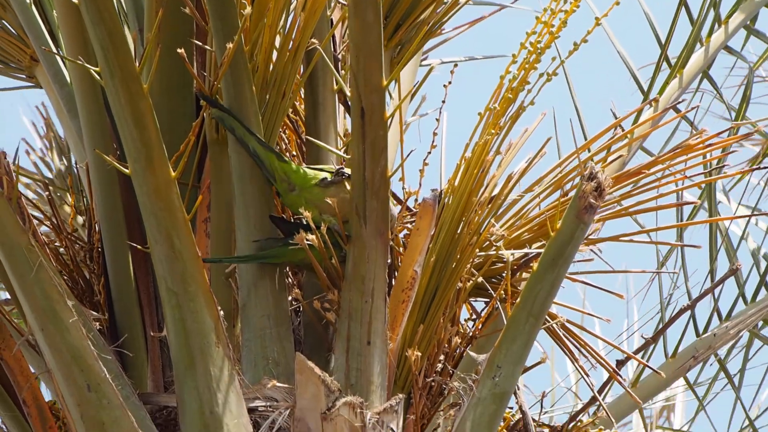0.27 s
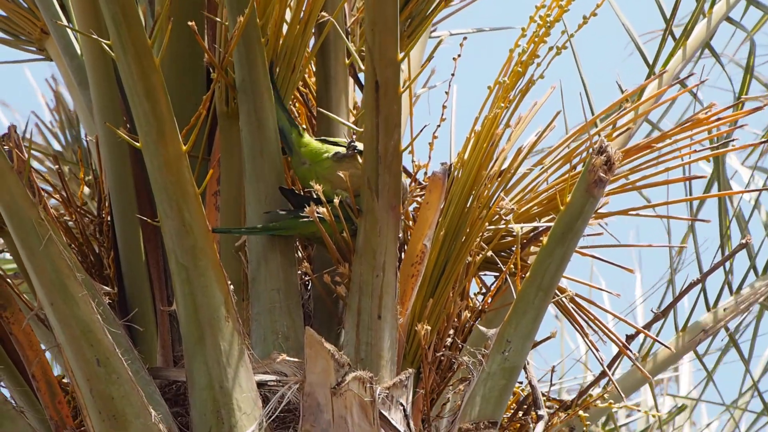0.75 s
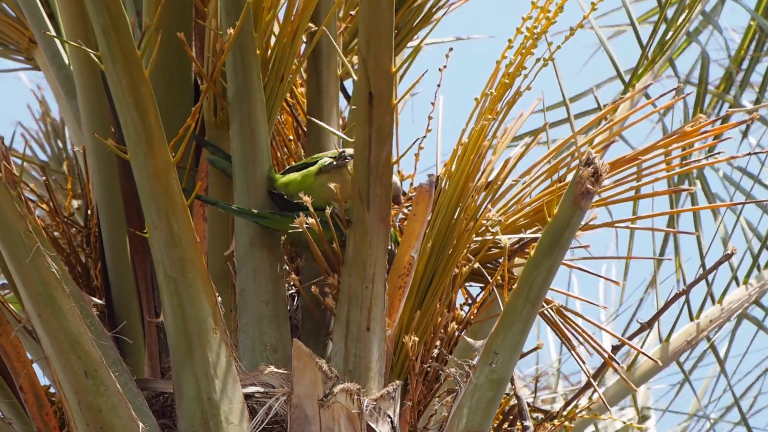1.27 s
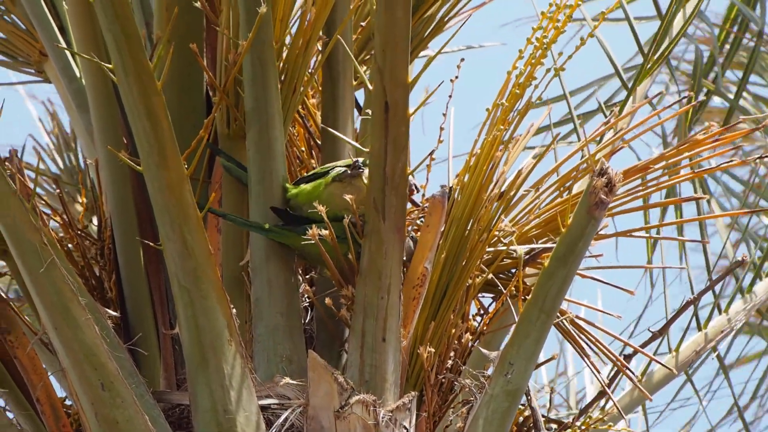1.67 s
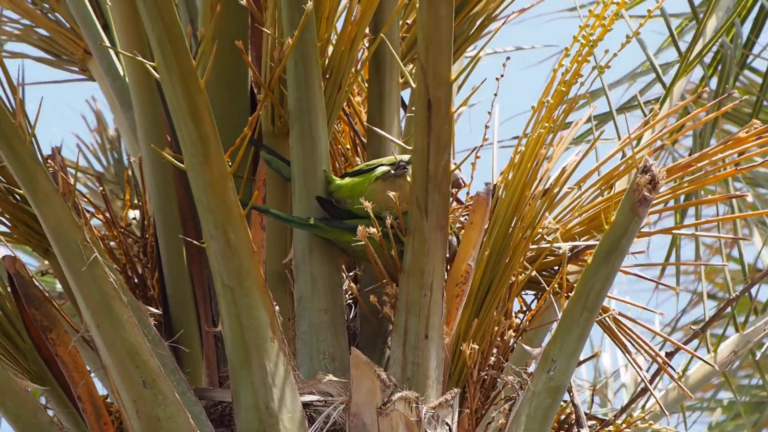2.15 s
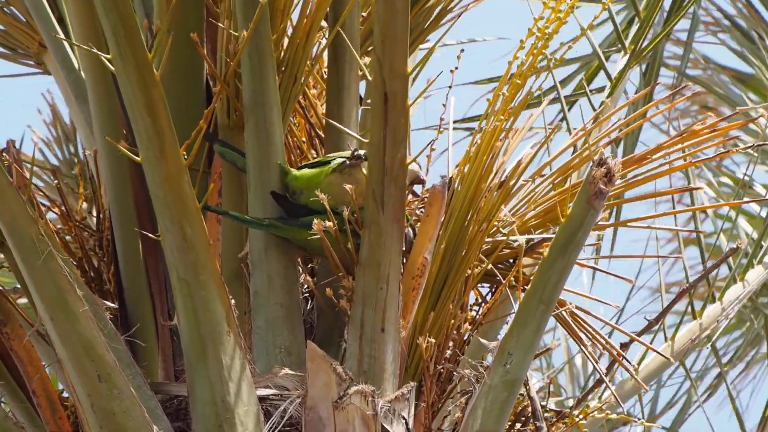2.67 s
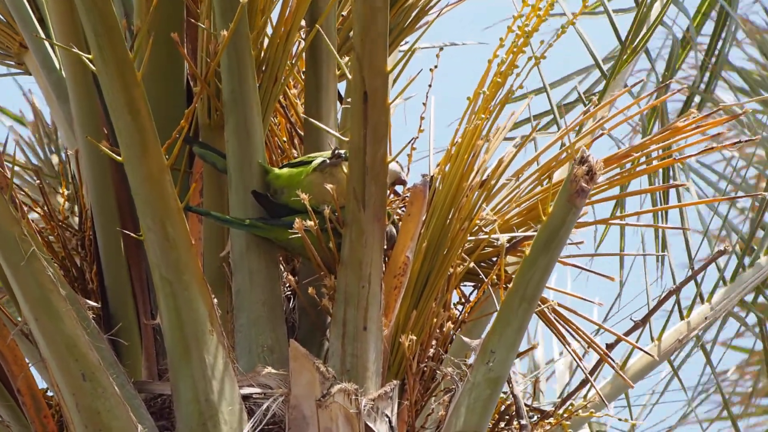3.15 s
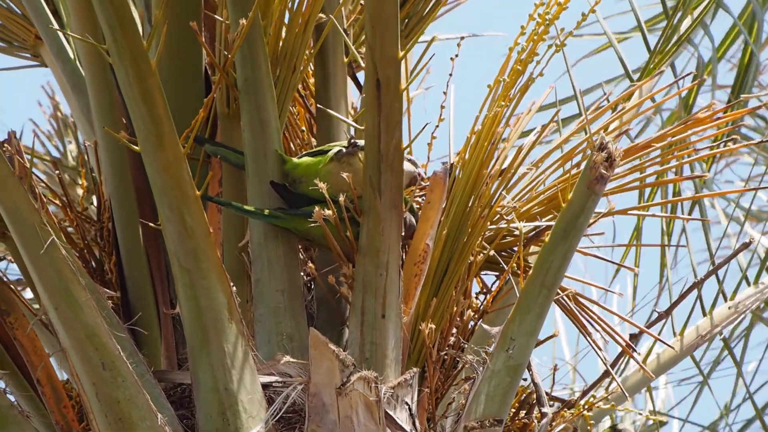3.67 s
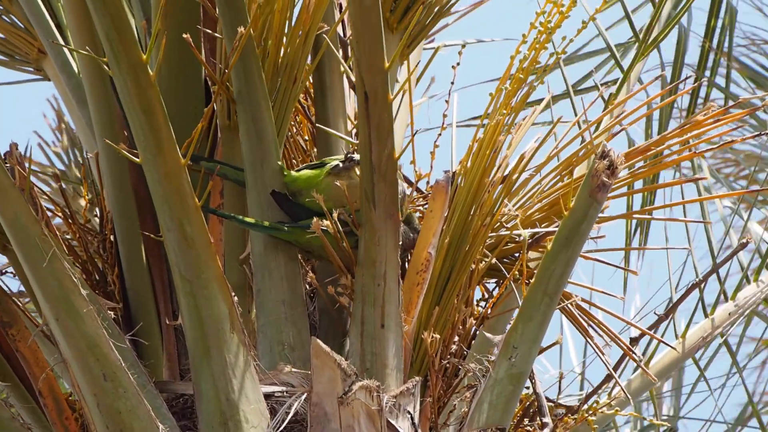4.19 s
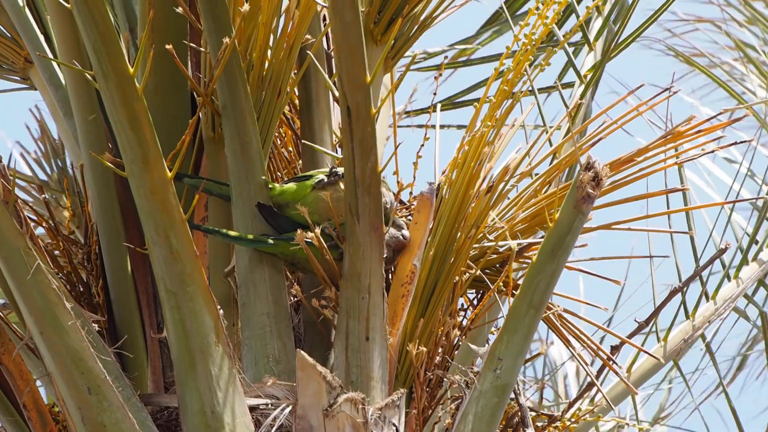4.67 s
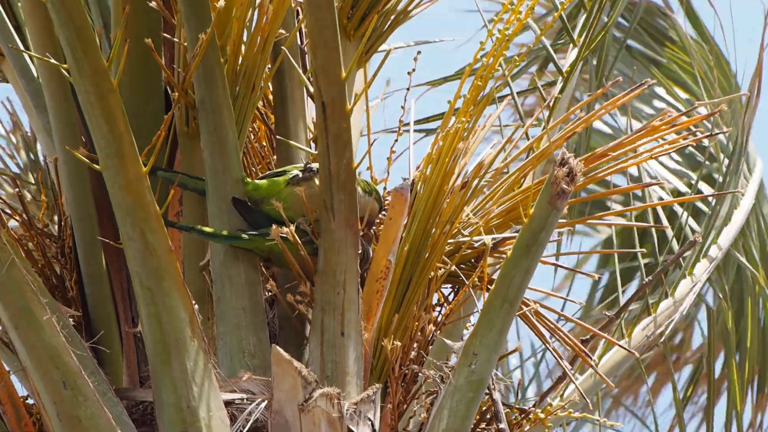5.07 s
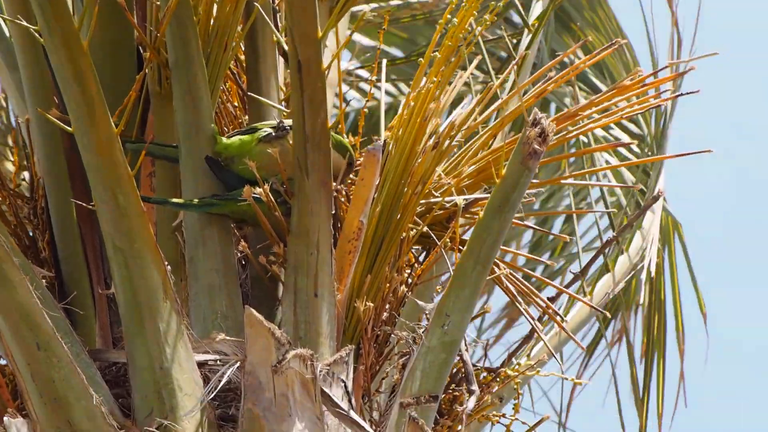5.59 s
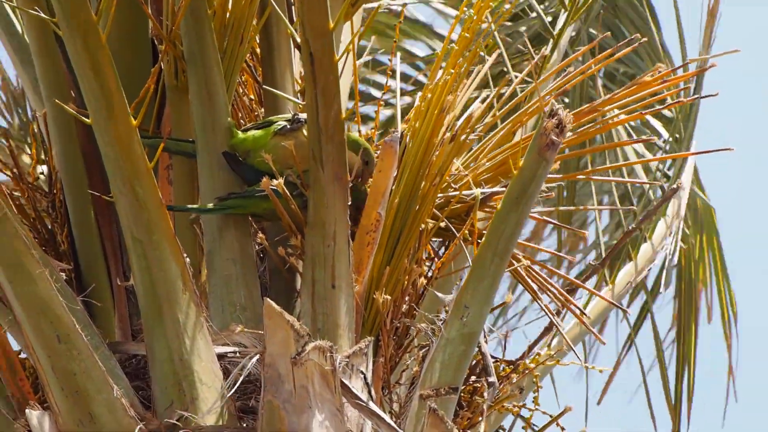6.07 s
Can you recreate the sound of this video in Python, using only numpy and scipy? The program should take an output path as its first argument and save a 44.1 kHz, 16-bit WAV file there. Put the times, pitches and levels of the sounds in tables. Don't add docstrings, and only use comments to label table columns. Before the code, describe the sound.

Wind buffets a camera microphone with lumpy rumbles and thumps while parakeets in a palm crown chirp, squawk harshly and squabble in quick warbles.

```python
import sys
import numpy as np
from scipy import signal
from scipy.fft import rfft, irfft, next_fast_len
from scipy.io import wavfile
from scipy.ndimage import uniform_filter1d, map_coordinates

SR = 44100
rng = np.random.default_rng(int(sys.argv[2]) if len(sys.argv) > 2 else 0)


def rack_gain(trim_db):
    fader = np.asarray(trim_db, float)
    return 10 ** (fader / 20)


def transcribe(signal):
    frames = np.atleast_2d(signal).T
    limited = np.clip(frames, -1, 1)
    pcm = np.round(limited * 32767).astype(np.int16)
    wavfile.write(sys.argv[1], SR, pcm)


N = 279153

# first pulse t/s, highest pulse t/s, last pulse t/s, level/dB, top pitch f/Hz
SQUAWKS = [
    (1.399, 1.517, 1.6, -39.5, 1189),
    (2.315, 2.469, 2.575, -27.5, 1248),
    (3.039, 3.15, 3.278, -26, 1100),
    (3.44, 3.534, 3.657, -24.5, 1031),
    (4.005, 4.141, 4.316, -27.5, 1103),
]
FOLDS_DB = [0, -2, 0, 4, -6, 4, -2, 2, -1, 2, 0, 3, 5, 6]
# f/Hz, level/dB
HARSH_THROAT = [(1000, -28), (1800, -5), (2800, 5.5), (5100, -3), (6300, -6.5), (8000, -12.5),
                (10500, -15.5), (12000, -32.5), (14500, -38), (15500, -45)]
# f/Hz, level/dB
SWEET_THROAT = [(1000, -7.5), (1900, -1.5), (3600, 2.5), (4600, -3), (5800, -6), (7500, -17), (9500, -10),
                (13000, -50)]
# f/Hz, level/dB
FAR_THROAT = [(3700, 0), (4000, -40)]
# offset t/ms, length t/ms, start f/Hz, middle f/Hz, end f/Hz
CONTACT_NOTES = [(5, 18, 1850, 2220, 2320), (25, 21, 1850, 2020, 1400), (47, 19, 1450, 1830, 1980),
                 (71, 15, 2000, 1680, 1850), (95, 21, 1900, 1740, 1760), (118, 28, 1250, 1100, 1140),
                 (153, 22, 1620, 1800, 1950), (178, 18, 2050, 1650, 1250)]
# t/s, level/dB, last note begins before t/ms
CONTACTS = [
    (.209, -39.5, 110),
    (.806, -37.5, 200),
    (2.011, -32, 200),
]
# t/s, pitch f/Hz, level/dB
SQUABBLE = [
    [(5.01, 2100, -34), (5.025, 2350, -29), (5.038, 1700, -33), (5.043, 2100, -29.5), (5.057, 2230, -33),
     (5.067, 1750, -36), (5.09, 2100, -36), (5.118, 2450, -36)],
    [(5.114, 1700, -30), (5.132, 2150, -36), (5.135, 1800, -27), (5.146, 1850, -29), (5.168, 2250, -29),
     (5.182, 1950, -44), (5.196, 1720, -26), (5.207, 2150, -33), (5.222, 2050, -33)],
    [(5.228, 2000, -36), (5.234, 1700, -35), (5.258, 1950, -37), (5.278, 2700, -45), (5.285, 1950, -40),
     (5.3, 1300, -48), (5.314, 1850, -36), (5.326, 1700, -48)],
    [(5.528, 2380, -30), (5.538, 1930, -33), (5.544, 2400, -42), (5.547, 2000, -26), (5.561, 2280, -40),
     (5.565, 1980, -30), (5.574, 1680, -30), (5.587, 2200, -34), (5.595, 2260, -34)],
]
# t/s, length t/ms, level/dB, start f/Hz, end f/Hz
CHIRPS = [(.545, 28, -40.5, 1400, 1650), (.573, 20, -42, 1800, 1500), (1.2, 20, -41, 1850, 1530),
          (1.84, 28, -39, 1700, 1450), (2.205, 14, -36, 1200, 1180), (3.68, 16, -34, 2350, 2400),
          (3.706, 13, -30, 1980, 1600), (3.719, 10, -31, 1600, 1850), (3.736, 34, -36, 1790, 1930),
          (3.774, 30, -35, 1870, 1950), (4.63, 30, -42, 1250, 1620), (4.736, 26, -33, 2380, 2260),
          (4.763, 14, -36, 1950, 1930), (4.793, 22, -38, 1800, 1700), (4.83, 55, -39, 1830, 2000),
          (4.859, 35, -41, 1200, 1360), (4.975, 15, -38, 2200, 2600), (5.342, 16, -32, 1820, 1650),
          (5.367, 22, -32, 2720, 2450), (5.378, 22, -31, 1120, 1160), (5.4, 22, -34, 2380, 2420),
          (5.495, 26, -35, 1750, 2200)]
# t/s, length t/ms, level/dB, end f/Hz (both ends), middle f/Hz
WHISTLES = [(5.8, 100, -41.5, 2060, 2060), (6.17, 150, -48, 2570, 2560), (.685, 42, -45, 2900, 3300),
            (.452, 26, -46, 2750, 3550), (1.725, 85, -43, 2330, 2720), (1.812, 36, -43, 2400, 3100),
            (1.875, 40, -45, 2700, 2300), (.4, 32, -44, 2850, 2350)]
# t/s, length t/s, level/dB
CHATTER = [(0, 0.13, -39.5), (0.418, 0.18, -38.5), (0.98, 0.13, -46), (1.42, .12, -32), (1.857, 0.12, -65),
           (2.24, 0.081, -43), (4.69, 0.84, -42), (5.177, 0.22, -32), (5.31, 0.22, -29), (5.46, 0.17, -33),
           (5.553, 0.052, -46), (2.85, 0.59, -46)]
# f/Hz, t60 t/s
CROWN_T60 = [(1000, 0.22), (4000, 0.31), (10000, 0.17)]
# f/Hz, level/dB
SCATTER = [(2000, -7.5), (5000, -9), (9000, -1.5)]
# t/s, flutter level/dB, left-right level/dB
WIND = [(0, -23, -23), (.25, -24, -20), (.5, -32, -12), (.8, -30.5, -28), (.96, -39, 4), (1.06, -25.5, -16),
        (1.31, -35, -9), (1.43, -71, 2), (1.6, -25.5, -34), (1.92, -40.5, -27), (2.3, -25.5, -12),
        (2.75, -38, -13), (3.45, -28.5, -13), (3.82, -25, 17.5), (4.0, -43.5, -6), (4.4, -56.5, -7),
        (4.7, -31.5, -37.5), (6.33, -32.5, -31)]
# t/s, length t/s, change of flutter level/dB
GUSTS = [(.13, 0.33, 1), (.64, 0.21, 13.5), (.81, 0.29, 9), (1.2, 0.14, 8), (1.72, 0.47, 5),
         (2.04, 0.08, 9.5), (2.19, 0.098, 8.5), (2.39, 0.14, -11), (2.6, 0.1, 9), (3.09, 0.16, 9),
         (3.24, 0.19, 9), (3.49, 0.1, 11), (3.62, 0.16, -5.5), (3.76, 0.047, 9), (4.16, 0.18, -16),
         (4.26, 0.19, 4), (4.55, 0.42, 9), (3.0, 0.092, 7.5), (5.0, 0.47, -20), (5.2, 0.059, 10.5),
         (5.42, 0.19, -6), (5.53, 0.06, 9), (5.6, 0.13, -15.5), (5.77, 0.26, -9), (1.96, 0.054, 9),
         (5.36, 0.059, 2), (5.9, 0.17, 1.5), (6.25, 0.9, 2)]
# t/s, peak level/dB, left-right level/dB
POPS = [(0.023, -13, -25), (0.08, -13.5, -25), (0.811, -16, -27), (1.175, -15, -26), (1.754, -14.5, -28),
        (0.141, -4.5, -35), (0.629, -0.5, -33), (0.644, -6, -36), (0.784, -13.5, -29), (1.124, -20, -29),
        (1.338, -22.5, -17), (1.652, -11.5, -29), (2.127, -15, -26.0), (2.132, -14, -28), (2.172, -11, -28),
        (2.464, -12, -34), (2.509, -15, -24), (3.073, -9.5, -26), (3.193, -21, -23), (3.458, -15.5, -23),
        (3.476, -8.5, -24), (3.701, -14, 27), (3.748, -8, 21), (3.839, -11, 14), (3.859, -8.5, 16),
        (3.947, -22, 11), (4.684, -20, -21)]
# f/Hz, level/dB
RUMBLE_SPECTRUM = [(15, -44), (30, -21), (60, -5), (100, 0.5), (160, 0), (260, -8.5), (450, -15.5),
                   (900, -61), (2000, -110)]
# f/Hz, level/dB
FLUTTER_SPECTRUM = [(100, -18), (250, 0.5), (400, 0), (700, -5.5), (1050, -12.5), (1300, -24),
                    (2000, -28.5), (4000, -46), (9000, -86)]
# f/Hz, level/dB
POP_SPECTRUM = [(150, 12), (900, 0.5), (1350, -14.0), (2200, -10), (6000, -36), (12000, -57)]
# f/Hz, level/dB
FROND_SPECTRUM = [(290, -41), (500, -26), (569, 0), (666, -4), (851, -8), (1040, -4.5), (1250, -13),
                  (1740, -6), (2680, -7), (5740, -23), (8840, -20), (15500, -40)]
# t/s, level/dB
HISS = [(0, -68), (1.5, -61), (3.1, -56.5), (4.6, -57), (6.33, -56)]
# t/s, level/dB
HUM = [(0, -47.5), (5.4, -83), (5.55, -48), (6.33, -43.5)]

HOARSE_UNTIL_S = 2
PULSE_S, DRAWL_S = .026, .035
CLIMB, SINK = .29, .2
CLIMB_DB, SINK_DB, UNEVEN_DB = 8.5, 5.5, 1.5
SECOND_DB = 6.5
ANSWER_DB, ANSWER_S = 0.5, 0.052
RUMBLE_DB, RUMBLE_FOLLOWS = -23, 0.33
GUST_LEANS = 0.031


def throat_pulses():
    rows = []
    for first, top, last, db, hz in SQUAWKS:
        spacing_s = DRAWL_S if first < HOARSE_UNTIL_S else PULSE_S
        s = np.linspace(first, last, round((last - first) / spacing_s) + 1)
        before = (np.clip(top - s, 0, None) / .15) ** 3
        after = np.clip((s - top) / (last - top), 0, None)
        pulse_db = db - CLIMB_DB * before - SINK_DB * after ** 4
        pulse_hz = hz * (1 - CLIMB * before - SINK * after ** 1.315)
        rows += zip(s, pulse_db, pulse_hz)
    scatter = [[.001], [UNEVEN_DB], [10]] * rng.standard_normal((len(rows), 3)).T
    return np.transpose(rows) + scatter


def warbles():
    calls = [(s + at / 1000, ms, db, *hz)
             for s, db, until_ms in CONTACTS
             for at, ms, *hz in CONTACT_NOTES if at < until_ms]
    glides = [(s, 1000 * (end - s), db, hz, to_hz)
              for turns in SQUABBLE
              for (s, hz, db), (end, to_hz, _) in zip(turns, turns[1:])]
    straight = [(s, ms, db, hz, (hz + to_hz) / 2, to_hz) for s, ms, db, hz, to_hz in glides + CHIRPS]
    return calls + straight


def sing(notes, throat, folds_db, jitter, breath_db, edge_s, uneven_db):
    voice, effort = np.zeros(N + SR), np.zeros(N + SR)
    shake = 1 + jitter * wobble(300, count=1)[0]
    order = np.arange(1, 15)[:, None]
    folds_db = np.reshape(folds_db, (-1, 1))
    luck = rng.standard_normal((len(notes), 14, 2))
    for (s, ms, db, f0_hz, f1_hz, f2_hz), dice in zip(notes, luck):
        at, n = round((s - edge_s / 2) * SR), round((ms / 1000 + edge_s) * SR)
        u = np.linspace(-1, 1, n) * (1 + edge_s * 1000 / ms)
        slope, bend = (f2_hz - f0_hz) / 2, (f0_hz + f2_hz) / 2 - f1_hz
        pitch_hz = f1_hz + slope * u + bend * u * u
        pitch_hz = pitch_hz[:N - at] * shake[at:at + n]
        partial_hz = order * pitch_hz
        gains = rack_gain(along(throat, partial_hz) + folds_db + uneven_db * dice[:, :1])
        gains = gains * (partial_hz < SR / 2)
        phase = order * 2 * np.pi * np.cumsum(pitch_hz) / SR + 2 * dice[:, 1:]
        stack = np.sum(gains * np.sin(phase), 0)
        window = signal.windows.tukey(n, min(1, 2 * edge_s * SR / n))
        shape = rack_gain(db) * window[:len(pitch_hz)]
        voice[at:at + len(pitch_hz)] += shape * unit(stack)
        effort[at:at + len(pitch_hz)] += shape
    breath = unit(coloured(rng.standard_normal(N), throat))
    return voice[:N] + rack_gain(breath_db) * uniform_filter1d(effort[:N], size=300) * breath


def parakeets(s, db, hz):
    gap_ms = 1000 * np.diff(s, append=9)
    drawl = s < HOARSE_UNTIL_S
    ms = np.where(drawl, np.minimum(gap_ms - 3, 40), np.minimum(gap_ms - 9, 17))
    sag = np.clip((db + 42) / 100, .03, .16) * rack_gain(rng.normal(0, .8, len(s)))
    pulses = np.transpose([s + .001, ms, db + 2, hz * (1 + 1.25 * sag), .99 * hz, hz * (1 + .7 * sag)])
    hoarse = sing(pulses[drawl], HARSH_THROAT, FOLDS_DB,
                  jitter=.018, breath_db=-4, edge_s=.008, uneven_db=3)
    harsh = sing(pulses[~drawl], HARSH_THROAT, FOLDS_DB,
                 jitter=.005, breath_db=-14, edge_s=.006, uneven_db=1.5)
    sweet = sing(warbles(), SWEET_THROAT, SECOND_DB * (np.arange(14) == 1),
                 jitter=.009, breath_db=-11, edge_s=.006, uneven_db=1.5)
    far = sing([(*row, row[3]) for row in WHISTLES], FAR_THROAT, 0,
               jitter=.003, breath_db=-60, edge_s=.015, uneven_db=0)
    return hoarse + harsh + sweet + far


def flock(pulse_s, birds):
    t = np.arange(N) / SR
    pitch_hz = np.array([[1900], [2200]]) * rack_gain(1.4 * wobble(65) + .15 * wobble(400))
    turns = 2 * np.pi * np.cumsum(pitch_hz, 1) / SR
    stacks = sum(np.sin(k * turns) for k in range(1, 5))
    notes = np.sum(stacks * np.clip(wobble(60), 0, 1), 0)
    since_s = t - pulse_s[np.searchsorted(pulse_s, t) - 1]
    silent = np.clip(np.abs(since_s) / .05 - 1, 0, 1)
    blur = unit(coloured(rng.standard_normal((2, N)), HARSH_THROAT))
    power = uniform_filter1d(birds ** 2, round(ANSWER_S * SR), origin=round(0.19 * ANSWER_S * SR))
    joining = rack_gain(ANSWER_DB) * np.sqrt(np.abs(power))
    level = joining + bumps([(s, length, rack_gain(db)) for s, length, db in CHATTER])
    warbled = .75 * silent * unit(coloured(notes, SWEET_THROAT))
    return level * rack_gain(-7) * (warbled + .45 * blur[0] + .35 * blur)


def crown(x):
    hz, t, z = signal.stft(rng.standard_normal((2, SR // 2)), SR, nperseg=256)
    decay = rack_gain(-60 * t / along(CROWN_T60, hz)[:, None])
    tail = signal.istft(z * decay, SR, nperseg=256)[1]
    return signal.fftconvolve(x[None], tail / np.linalg.norm(tail[0]), axes=1)[:, :N]


def wind():
    calm_db, calm_pan = curves(WIND)
    gust_db = bumps(GUSTS)
    flutter_db, flutter_pan = calm_db + gust_db, calm_pan * (1 + GUST_LEANS * gust_db)
    rumble_db = RUMBLE_DB + RUMBLE_FOLLOWS * (flutter_db + 31)
    rumble_pan = 0.4 * flutter_pan
    eddies, spikes = wobble(18), wobble(38)
    lumps = rack_gain(1.06 * eddies + 2.5 * spikes) * rng.standard_normal((2, N))
    flaps = rack_gain(2.7 * eddies + 5 * spikes + 4.4 * wobble(150)) * rng.standard_normal((2, N))
    rumble = ports(rumble_db + 0.21, rumble_pan) * steady(coloured(lumps, RUMBLE_SPECTRUM))
    flutter = ports(flutter_db - .3, flutter_pan) * steady(coloured(flaps, FLUTTER_SPECTRUM))
    return rumble + flutter + wind_pops()


def wind_pops():
    blows = np.zeros((2, N))
    for s, db, pan_db in POPS:
        blows[:, round((s + .003) * SR)] = ports(db + 24, pan_db)
    push = np.diff(signal.windows.hann(56), prepend=0)
    return coloured(signal.fftconvolve(blows, push[None], axes=1)[:, :N], POP_SPECTRUM)


def fronds():
    a, b = unit(coloured(rng.standard_normal((2, N)), FROND_SPECTRUM))
    hiss_db = curves(HISS)[0] + 14.0 + 0.64 * wobble(7.3)
    hiss = rack_gain(hiss_db) * np.array([a + 0.9 * b, a - 0.73 * b])
    hum_hz = 1039 + 3 * wobble(10, count=1)[0]
    hum = rack_gain(curves(HUM)[0]) * np.sin(2 * np.pi * np.cumsum(hum_hz) / SR)
    return hiss + hum


def unit(x):
    return x / np.sqrt(np.mean(x ** 2, -1, keepdims=True) + 1e-20)


def steady(x):
    return x / np.sqrt(np.abs(uniform_filter1d(x ** 2, size=4000)) + 0.058 * np.mean(x ** 2))


def along(points, hz):
    f, v = np.transpose(points)
    return np.interp(np.log(hz + 1), np.log(f + 1), v)


def coloured(x, spectrum):
    m = next_fast_len(N + 8192)
    gain = rack_gain(along(spectrum, np.fft.rfftfreq(m, 1 / SR)))
    return irfft(rfft(x, m) * gain, m)[..., :N]


def curves(rows):
    s, *cols = np.transpose(rows)
    return [np.interp(np.arange(N) / SR, s, c) for c in cols]


def bumps(rows):
    t = np.arange(N) / SR
    return sum(height * np.cos(np.pi * np.clip((t - s) / length, -.5, .5)) ** 2
               for s, length, height in rows)


def wobble(rate_hz, count=2):
    knots = rng.standard_normal((count, 3000))
    return np.array([map_coordinates(k, [np.arange(N) * rate_hz / SR], order=2) for k in knots])


def ports(level_db, pan_db):
    sides = rack_gain(np.array([pan_db, -pan_db]) / 2)
    return 2 * rack_gain(level_db) * sides / np.sqrt(rack_gain(pan_db) + rack_gain(-pan_db))


def scene():
    pulses = throat_pulses()
    birds = parakeets(*pulses)
    direct = np.array([rack_gain(-4.5) * np.roll(birds, shift=1), rack_gain(-1.4) * birds])
    return direct + crown(coloured(birds, SCATTER)) + flock(pulses[0], birds) + wind() + fronds()


def low_pass(x):
    return signal.sosfilt(signal.butter(12, 15620, fs=SR, output="sos"), x)


def record(dry):
    rounded = dry / (1 + np.abs(dry / .87) ** 5) ** (1 / 5)
    return low_pass(rounded)


dry = scene()
out = record(dry)
transcribe(out)
```